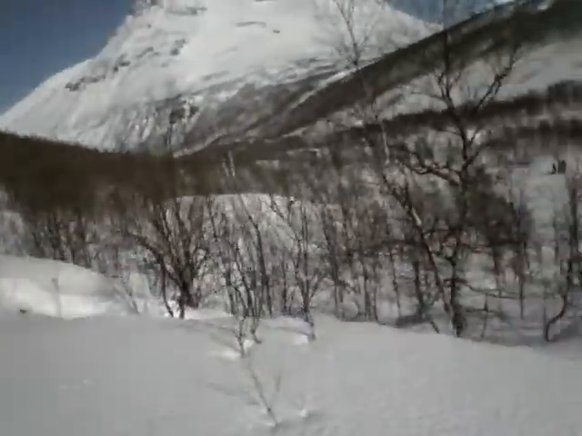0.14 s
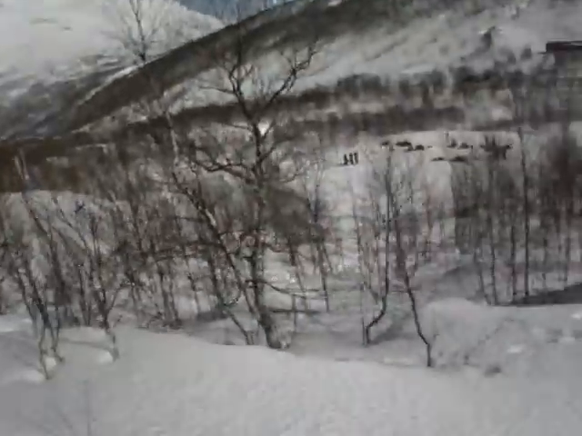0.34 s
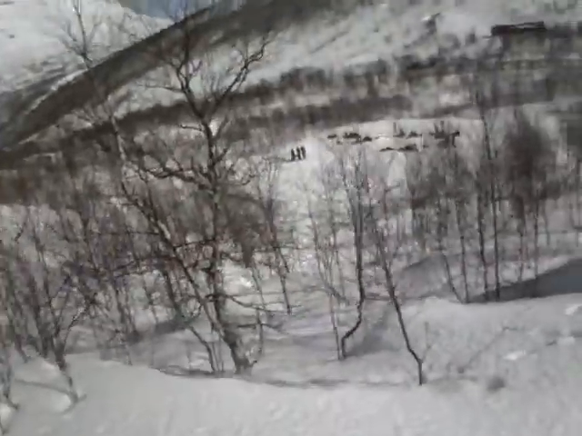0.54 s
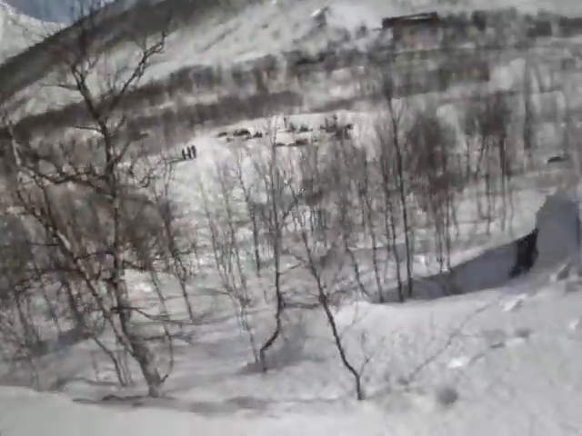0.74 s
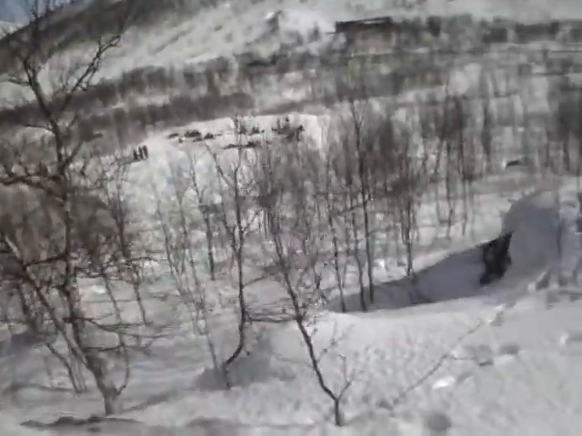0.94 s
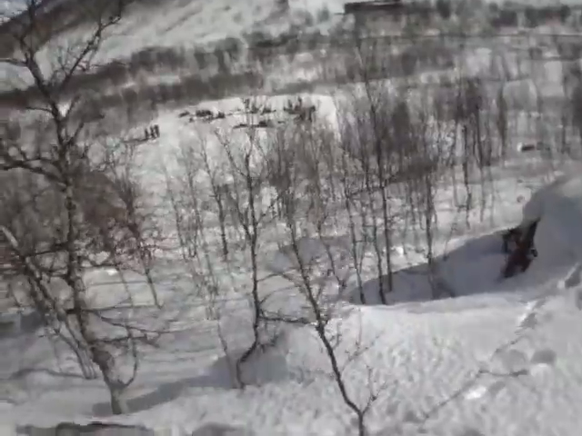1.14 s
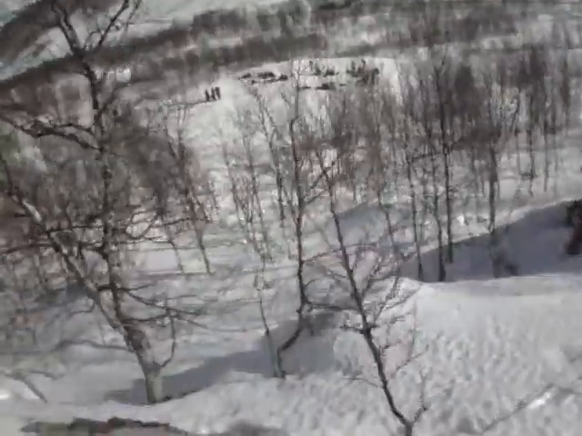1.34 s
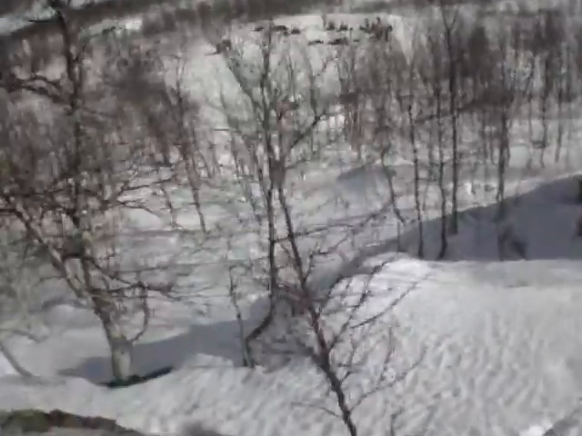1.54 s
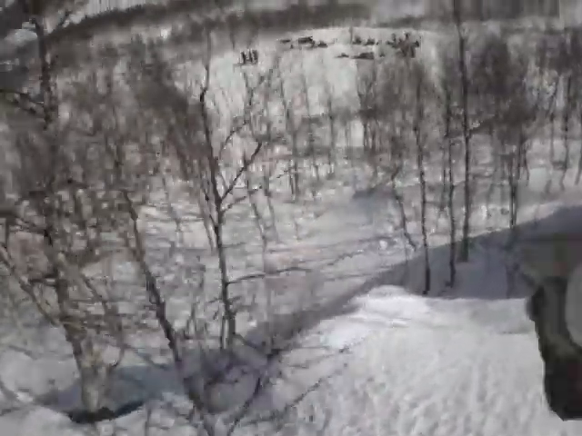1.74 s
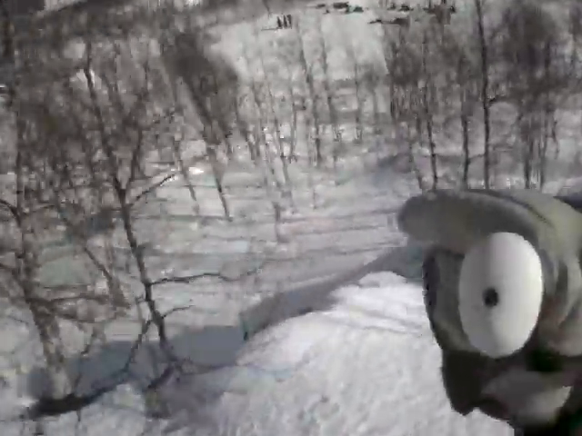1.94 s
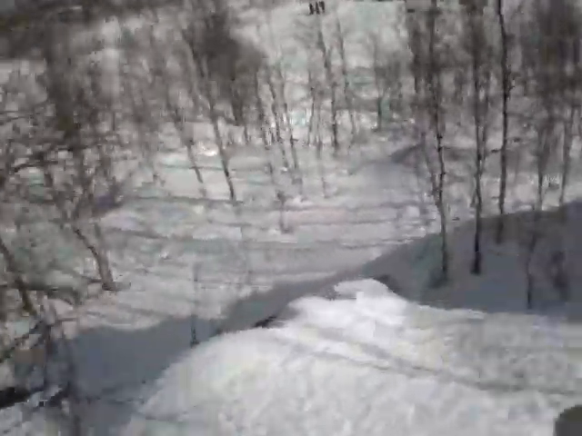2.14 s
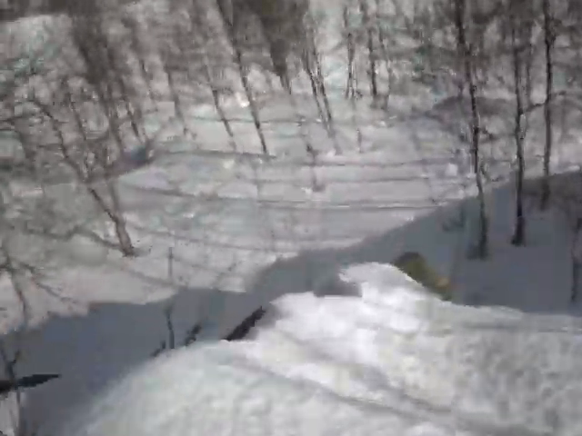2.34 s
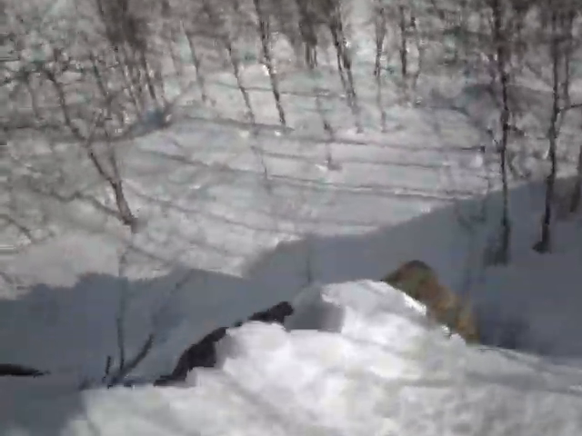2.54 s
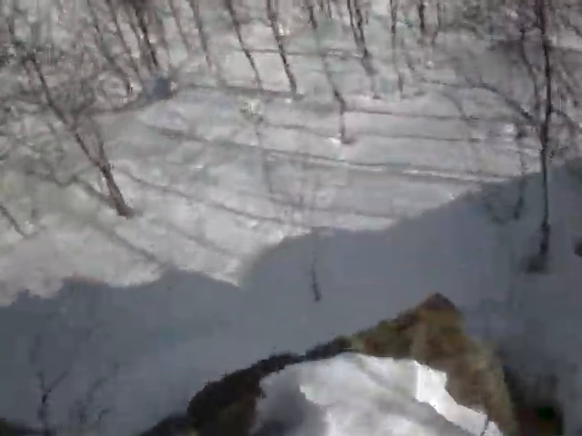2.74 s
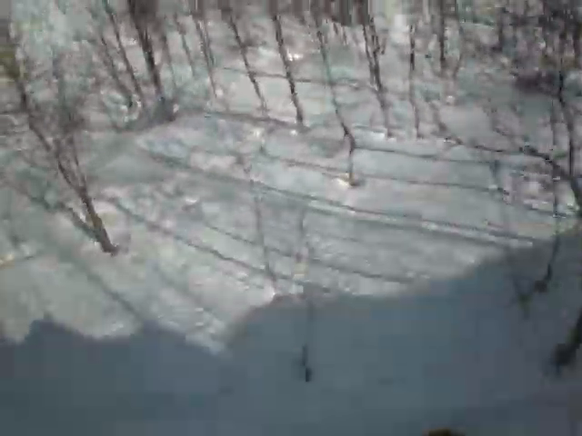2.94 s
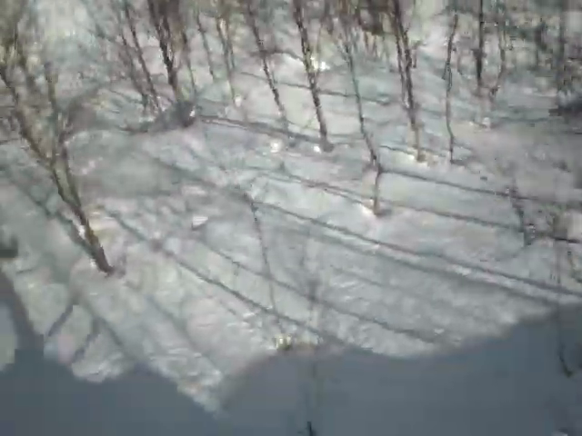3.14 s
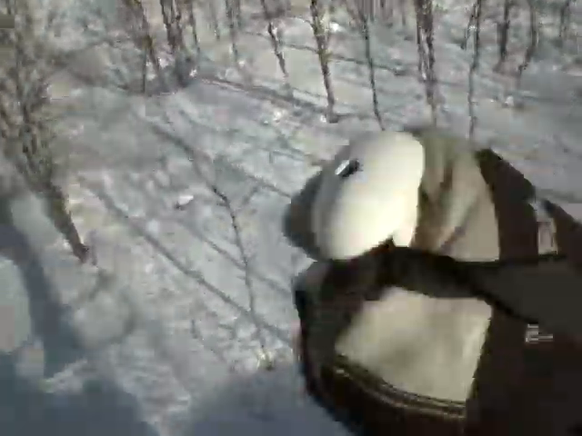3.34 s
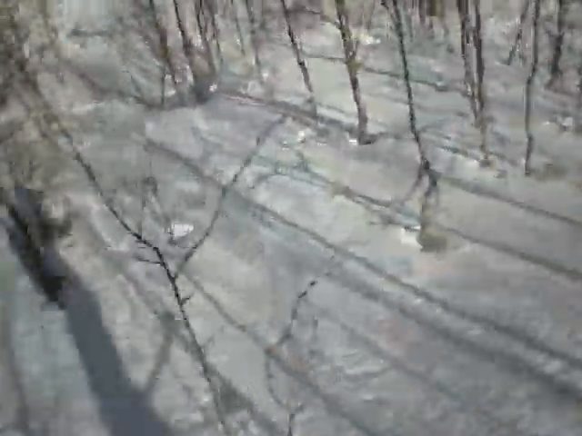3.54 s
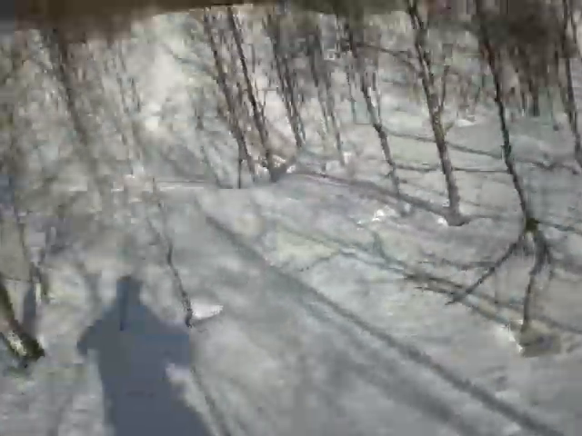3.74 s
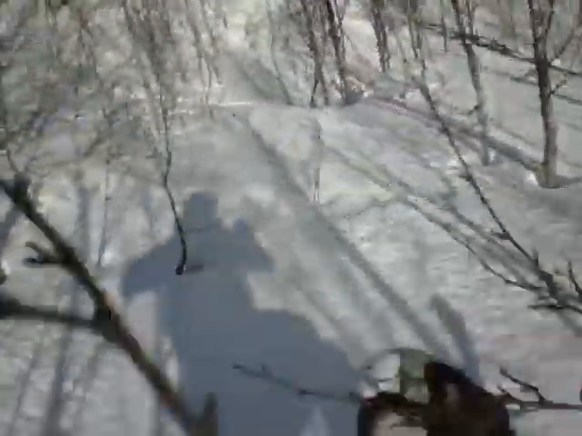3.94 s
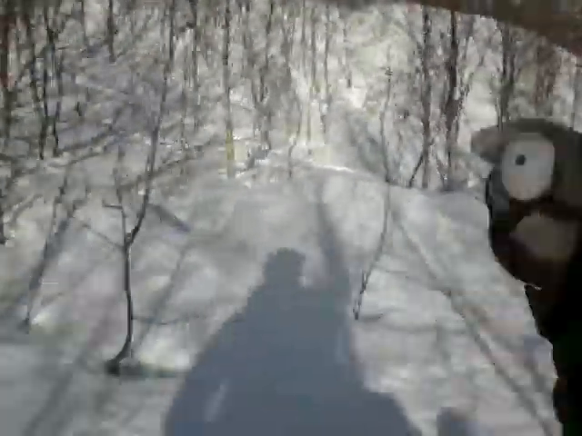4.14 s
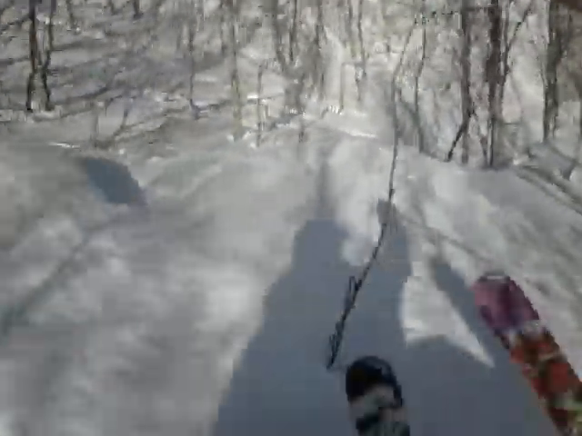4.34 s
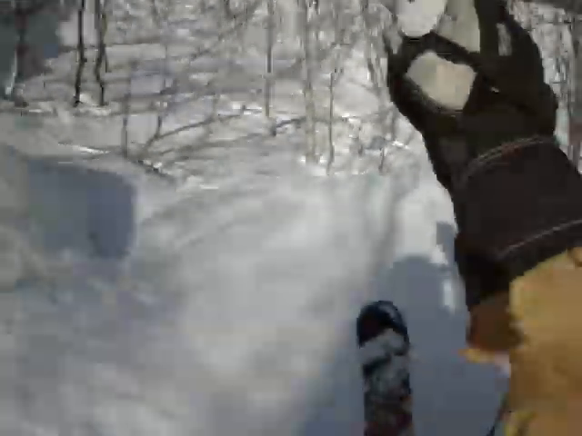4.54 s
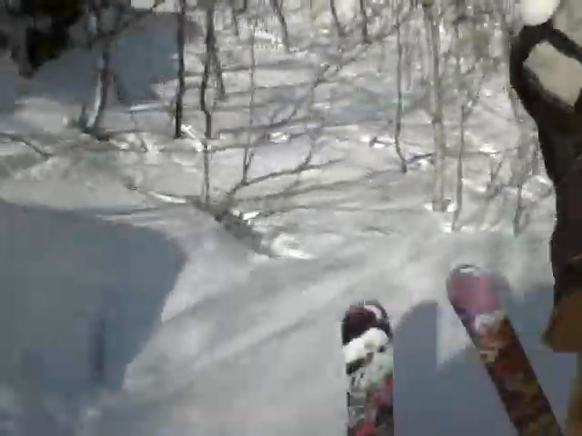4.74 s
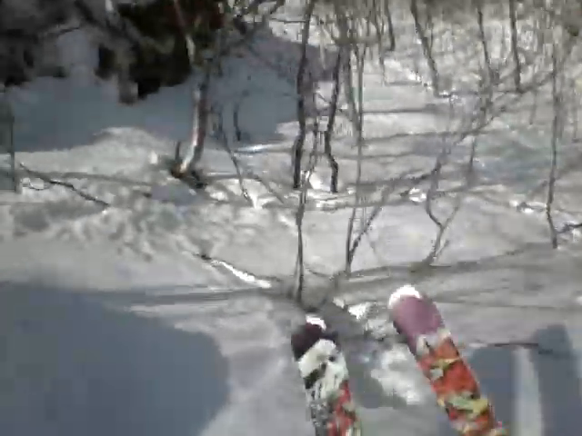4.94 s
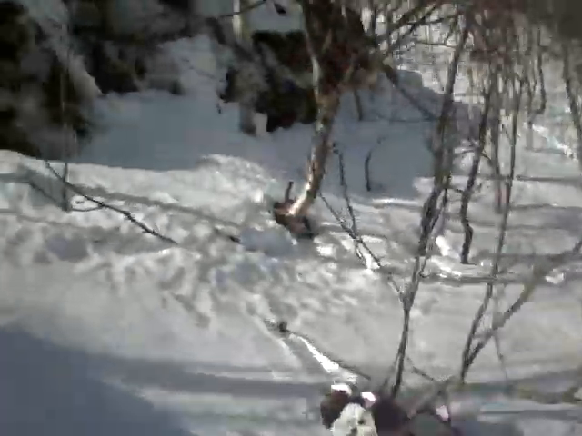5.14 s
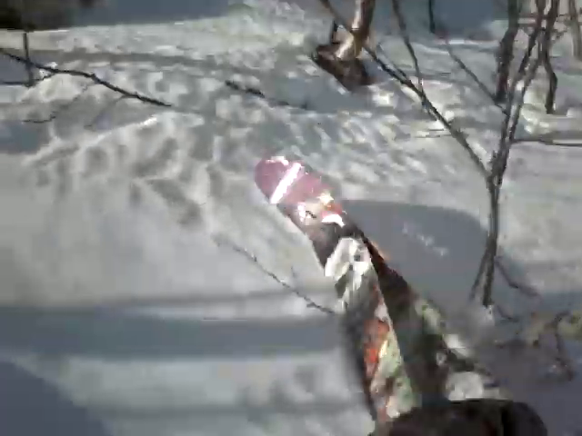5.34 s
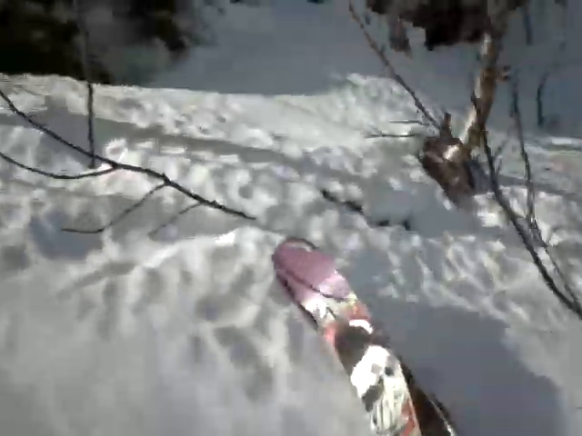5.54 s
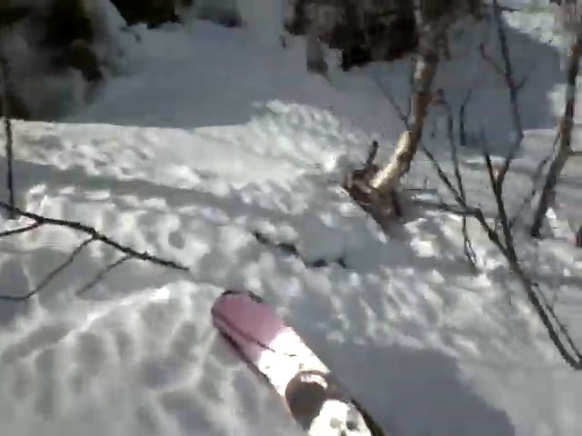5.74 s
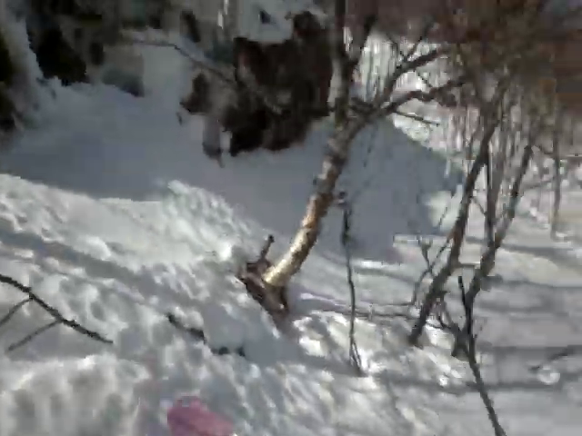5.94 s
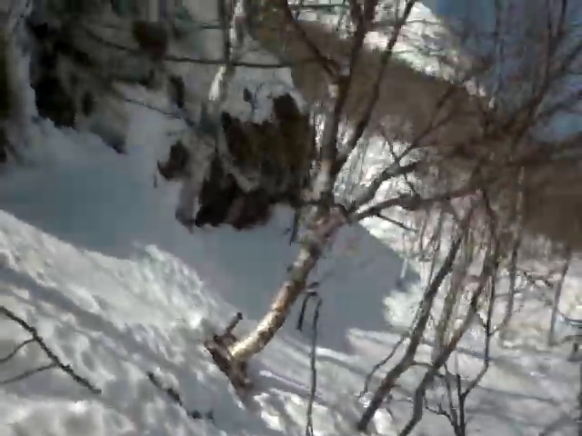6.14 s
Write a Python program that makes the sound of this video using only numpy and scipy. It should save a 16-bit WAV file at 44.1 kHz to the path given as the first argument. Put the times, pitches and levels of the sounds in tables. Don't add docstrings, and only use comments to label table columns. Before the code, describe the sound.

From a small helmet microphone outdoors, skis whisper over snow while blunt knocks and little ticks hit the housing. Wind builds in low buffets and an edge stroke rasps harder. The glide drops out briefly in a jump, then a hard landing bursts into clipped booms and harsh scrapes. Twigs snap, a pole rings briefly, more jolts follow, and it settles into faint rasping. The sound is narrow, dull and close.

```python
import sys
import numpy as np
from scipy import signal
from scipy.fft import rfft, irfft, next_fast_len
from scipy.io import wavfile
from scipy.ndimage import map_coordinates

SR = 44100
rng = np.random.default_rng(int(sys.argv[2]) if len(sys.argv) > 2 else 0)


def makeup_ratio(level_db):
    decades = np.asarray(level_db, float) / 20
    return 10 ** decades


def inscribe(sig):
    pcm = np.round(np.clip(np.atleast_2d(sig).T, -1, 1) * 32767)
    wavfile.write(sys.argv[1], SR, pcm.astype(np.int16))


N = 276934
MID_WIND_DB, MID_SHAKE_DB, MID_RUB_DB = -27, -22, -30


def unit(x):
    return x / np.sqrt(np.mean(x ** 2) + 1e-20)


def seconds():
    return np.arange(N) / SR


def noise():
    return rng.standard_normal(N)


def wobble(rate):
    knots = rng.standard_normal(int(N * rate / SR) + 4)
    return map_coordinates(knots, [np.arange(N) * rate / SR])


def filtered(x, response):
    size = next_fast_len(N + SR // 2)
    hz = np.fft.rfftfreq(size, 1 / SR)
    return irfft(rfft(x, size) * response(hz), size)[..., :N]


def along(points, hz):
    point_hz, value = np.transpose(points)
    return np.interp(np.log(hz + 1), np.log(point_hz + 1), value)


def coloured(x, spectrum):
    return unit(filtered(x, lambda hz: makeup_ratio(along(spectrum, hz))))


def resonant(x, modes):
    def response(hz):
        body = 0
        for k, (centre, width, db) in enumerate(modes):
            damping = 1j * hz * width
            body = body + (-1) ** k * makeup_ratio(db / 2) * damping / (centre ** 2 - hz ** 2 + damping)
        return body ** 2
    return unit(filtered(x, response))


def grainy(per_second, spread_db, share):
    chance, size, sign = rng.random(N), rng.exponential(size=N), noise()
    grains = (chance < per_second / SR) * sign * makeup_ratio(spread_db * np.minimum(size, 3))
    return np.sqrt(share) * unit(grains) + np.sqrt(1 - share) * noise()


def follows(middle_db, *drives):
    return middle_db + sum(gain * drive for drive, gain in drives)


def with_swells(curve, swells, rise, fall):
    t = seconds()
    curve_s, curve_db = np.transpose(curve)
    power = makeup_ratio(2 * np.interp(t, curve_s, curve_db))
    for start, length, db in swells:
        u = (t - start) / length
        shape = np.clip(u / rise, 0, 1) * np.clip((1 - u) / fall, 0, 1)
        power = power + makeup_ratio(2 * db) * shape ** 2
    return 10 * np.log10(power)


# time in seconds, strength in dB.
WIND_CURVE = [(0, -43), (.5, -43.5), (.7, -31.5), (1.05, -37.5), (1.35, -27), (1.6, -37), (1.87, -34.5),
              (2.15, -22), (2.6, -31), (3.0, -27), (3.4, -19), (4.0, -16.5), (4.45, -18), (5.0, -21),
              (5.35, -20.5), (5.55, -36), (6.0, -32.5), (6.28, -38)]
# start in seconds, length in seconds, strength in dB.
GUST_SWELLS = [(0.541, 0.087, -32), (1.68, .1, -31), (1.888, 0.16, -19.5), (2.24, .09, -20),
               (2.326, 0.12, -18.5), (3.097, 0.14, -24.5), (3.46, .16, -15.5), (3.675, .15, -11.5),
               (4.092, .19, -8), (4.536, .13, -13), (4.71, .07, -15.5), (4.797, .07, -17),
               (4.891, .13, -16), (5.295, 0.057, -27.5)]


def wind_drive():
    return with_swells(WIND_CURVE, GUST_SWELLS, rise=0.33, fall=0.4) - MID_WIND_DB


# time in seconds, strength in dB.
SHAKE_CURVE = [(0, -30.5), (.2, -32), (.65, -25), (1.05, -25.5), (1.55, -33), (1.85, -31.5), (2.0, -19),
               (2.6, -23), (2.7, -31), (3.1, -23.5), (3.3, -32.5), (3.55, -17.5), (3.95, -18),
               (4.68, -19.5), (5.0, -18), (5.45, -22.5), (5.7, -29), (6.28, -29)]
# start in seconds, length in seconds, strength in dB.
JOLT_SWELLS = [(.25, 0.076, -28), (1.129, .3, -22.5), (2.242, 0.44, -22), (2.32, .17, -21.5),
               (3.445, .17, -15), (3.702, .12, -12), (3.829, 0.043, -15), (4.027, .21, -5),
               (4.267, 0.23, -13.5), (4.492, 0.075, -16.5), (4.714, 0.056, -19), (5.061, 0.094, -12.5),
               (5.126, 0.19, -10.5), (5.366, 0.064, -20), (5.79, 0.16, -27.5)]


def shake_drive():
    return with_swells(SHAKE_CURVE, JOLT_SWELLS, rise=0.13, fall=0.45) - MID_SHAKE_DB


# time in seconds, strength in dB.
GLIDE_CURVE = [(0, -42.5), (.5, -40.5), (1.08, -41.5), (1.5, -36), (1.85, -36.5), (2.15, -29.5),
               (2.7, -31.5), (3.22, -33.5), (3.33, -48), (3.65, -48), (3.75, -35.5), (3.97, -32.5),
               (4.3, -30), (5.0, -25), (5.5, -27.5), (5.65, -35), (5.69, -46.5), (6.28, -35)]
# start in seconds, length in seconds, strength in dB.
EDGE_STROKES = [(0.253, 0.043, -33.5), (0.363, .14, -43), (0.564, 0.13, -34.5), (0.664, 0.17, -34.5),
                (.83, 0.036, -38), (1.121, .14, -33), (1.22, 0.29, -29), (1.6, .18, -38),
                (2.185, 0.51, -22), (2.31, .22, -23), (2.772, 0.093, -30), (3.476, 0.053, -40.5),
                (3.563, .06, -35), (3.688, .1, -24.5), (3.811, .06, -28), (4.03, .09, -14),
                (4.13, .12, -21), (4.309, 0.21, -18.5), (4.499, .07, -27), (4.711, .045, -21),
                (4.885, 0.049, -31), (5.071, 0.12, -26.5), (5.133, 0.2, -20.5), (5.363, 0.12, -25.5),
                (5.594, .09, -35.5), (5.721, 0.044, -33), (5.767, 0.16, -27), (5.916, 0.047, -34.5),
                (6.017, 0.045, -34), (6.08, 0.19, -34.5)]


def rub_drive():
    return with_swells(GLIDE_CURVE, EDGE_STROKES, rise=0.16, fall=0.29) - MID_RUB_DB


# frequency in Hz, level in dB per Hz.
HEAVE_SPECTRUM = [(6, -27.5), (20, -2.5), (45, -1), (85, -5.5), (130, -28), (300, -54), (600, -120)]
# frequency in Hz, level in dB per Hz.
BUFFET_SPECTRUM = [(25, -120), (65, -21), (100, -2.5), (145, -3.5), (210, -5.5), (400, -33), (1500, -120)]
# centre in Hz, width in Hz, level in dB.
PORT_MODES = [(319, 284, 0)]
# centre in Hz, width in Hz, level in dB.
CAVITY_MODES = [(529, 340, 9), (816, 320, -11.5)]


def wind(flutter, air, shake):
    heave = coloured(makeup_ratio(4.2 * wobble(14)) * noise(), HEAVE_SPECTRUM)
    buffet = coloured(makeup_ratio(2.5 * wobble(14)) * noise(), BUFFET_SPECTRUM)
    port_kicks = makeup_ratio(flutter + 0.75 * wobble(30)) * grainy(per_second=240, spread_db=2.5, share=0.37)
    cavity_kicks = makeup_ratio(2.0 * flutter + 0.24 * wobble(45)) * grainy(per_second=240, spread_db=-0.5, share=0.27)
    heave_db = follows(-27.5, (air, 1.154))
    buffet_db = follows(-26, (air, 0.93))
    port_db = follows(-24, (air, 0.59), (shake, 0.36))
    cavity_db = follows(-22, (air, 0.012), (shake, 0.98))
    pressure = makeup_ratio(heave_db) * heave + makeup_ratio(buffet_db) * buffet
    port = makeup_ratio(port_db) * resonant(port_kicks, PORT_MODES)
    cavity = makeup_ratio(cavity_db) * resonant(cavity_kicks, CAVITY_MODES)
    return pressure + port + cavity


# frequency in Hz, level in dB per Hz.
CRUNCH_SPECTRUM = [(500, -120), (800, 3.5), (1000, -14.5), (1300, -1.5), (1700, -10), (2100, -11),
                   (3000, -120)]
# centre in Hz, width in Hz, level in dB.
SHELL_MODES = [(2470, 420, 0.74), (2947, 376, 0.32)]
# centre in Hz, width in Hz, level in dB.
LOW_SHELL_MODES = [(2034, 550, 0.0032)]
# centre in Hz, width in Hz, level in dB.
FIZZ_MODES = [(3214, 353, -1.5), (3520, 1160, -9)]


def snow(flutter, shake, rub):
    rough_db = 1.3 * wobble(22)
    grains = makeup_ratio(2.3 * flutter + rough_db) * grainy(per_second=700, spread_db=3.5, share=0.3)

    def patchy():
        return grains * makeup_ratio(1.64 * wobble(20))

    landed = seconds() > 3.7
    crunch_db = follows(-39.5, (shake, 0.59), (rub, 0.13))
    low_db = follows(-33, (rub, 0.83))
    fizz_db = follows(-41, (rub, 1.02)) + 3.5 * landed
    crunch = makeup_ratio(crunch_db) * coloured(patchy(), CRUNCH_SPECTRUM)
    rasp = makeup_ratio(MID_RUB_DB + rub) * resonant(patchy(), SHELL_MODES)
    low = makeup_ratio(low_db) * resonant(patchy(), LOW_SHELL_MODES)
    fizz = makeup_ratio(fizz_db) * resonant(patchy(), FIZZ_MODES)
    return rasp - low + fizz + crunch


# centre in Hz, width in Hz, level in dB.
HELMET_MODES = [(911, 170, 0)]


def helmet(flutter, shake, rub):
    patter = makeup_ratio(1.2 * flutter + 1.9 * wobble(35)) * grainy(per_second=400, spread_db=0.0, share=0.3)
    hum_db = follows(-39.5, (shake, 0.58), (rub, 0.5))
    return makeup_ratio(hum_db) * resonant(patter, HELMET_MODES)


# frequency in Hz, level in dB per Hz.
HISS_SPECTRUM = [(300, -39.5), (1500, -20), (3000, 1.5), (4300, -2), (6000, 1.5)]


def hiss():
    return makeup_ratio(-55 + 2.5 * wobble(25)) * coloured(noise(), HISS_SPECTRUM)


def hits(events, gain_db, attack_s, puff):
    out = np.zeros(N + SR)
    t = np.arange(SR // 10) / SR
    shell_noise = resonant(noise(), LOW_SHELL_MODES + SHELL_MODES + FIZZ_MODES)
    shell_noise = np.pad(shell_noise, (0, SR))
    for start, db, hz, t60 in events:
        i = round(start * SR)
        ring = np.sin(2 * np.pi * hz * t) + puff * shell_noise[i:i + len(t)]
        decay = makeup_ratio(db + gain_db - 60 * t / max(t60, 0.003))
        out[i:i + len(t)] += decay * (1 - np.exp(-t / attack_s)) * ring
    return out[:N]


# time in seconds, peak in dB, pitch in Hz.
TICK_EVENTS = [(.0522, -14.5, 1520), (.163, -27, 2640), (.27, -17.5, 2600), (.6245, -14.5, 2870),
               (2.2155, -9, 2260), (2.8722, -17, 1550), (3.0836, -16.5, 2490), (3.1344, -8.5, 2210),
               (3.2633, -19, 2300), (3.3992, -24, 1230), (3.4067, -23, 3120), (3.6046, -10.5, 2200),
               (3.7119, -13.5, 3120), (3.7913, -3.5, 2760), (3.8162, -12.5, 2510), (3.9052, -16, 2660),
               (3.9437, -9, 2650), (3.9715, -17, 2405), (4.3085, -10.5, 2550), (4.477, -10, 2310),
               (4.941, -10, 2720)]


def ticks():
    events = [(s, db, hz, 0.01) for s, db, hz in TICK_EVENTS]
    return hits(events, gain_db=5.5, attack_s=0.0011, puff=0.9)


# time in seconds, peak in dB, pitch in Hz.
KNOCK_EVENTS = [(.053, -7.5, 540), (.162, -19, 690), (.533, -15.5, 549), (.627, -4, 640), (.7, -4, 630),
                (.793, -8.5, 544), (.87, -16, 530), (1.036, -26, 549), (1.223, -2.5, 606), (2.296, -8, 606),
                (2.352, 0, 483), (2.406, -0.5, 686), (2.465, -0.5, 530), (2.87, -10.5, 560),
                (3.192, -8, 414), (3.488, -6, 590), (3.556, -6, 466), (3.575, 2, 570), (3.642, -7, 570),
                (3.758, 5.5, 549), (3.891, -3.5, 457), (4.553, -7.5, 541), (4.61, -8.5, 447),
                (4.826, -5.5, 425), (4.893, -3, 538), (4.941, -13, 547), (5.025, 0.5, 450), (5.11, 1, 401),
                (5.514, -12.5, 520), (5.98, -14, 590)]


def knocks():
    events = [(s, db, hz, 0.013) for s, db, hz in KNOCK_EVENTS]
    return hits(events, gain_db=7.5, attack_s=0.0017, puff=0.045)


# centre in seconds, width in seconds, pressure (- pulls, + presses).
GUST_FRONTS = [(1.96, 0.0081, -0.43), (3.522, 0.028, -0.21), (3.698, 0.0083, 0.19), (3.738, 0.018, -0.54),
               (3.839, 0.094, 0.31), (3.998, 0.003, -0.5), (4.195, 0.0041, -1.3), (4.231, 0.0098, 1),
               (4.244, 0.004, 0.44), (4.282, 0.012, -0.43), (4.611, 0.006, -0.11), (4.738, 0.006, -0.7),
               (4.743, 0.0041, -0.12), (4.842, 0.021, -0.04), (4.923, 0.0077, -0.26), (5.34, 0.041, 0.25)]


def shoves():
    t = seconds()
    return sum(pressure * np.exp(-(2 * (t - s) / width) ** 2) for s, width, pressure in GUST_FRONTS)


# start in seconds, length in seconds, boom in dB, rasp in dB.
SCRAPE_EVENTS = [
    (3.772, 0.032, -11, -24.5),
    (4.004, 0.011, -10.5, -7),
    (4.032, 0.039, 5.5, -12),
    (4.071, 0.016, -13.5, -0.5),
    (4.088, 0.056, 7, -7.5),
    (4.171, 0.019, -5, -6.5),
    (4.198, 0.035, 5.5, -14),
    (4.72, 0.019, -9.5, -4.5),
    (5.139, 0.1, -15, -34),
    (5.3778, 0.0072, -3, -3.5),
]


def scrapes():
    t = seconds()
    boom, rasp = np.zeros(N), np.zeros(N)
    for start, length, boom_db, rasp_db in SCRAPE_EVENTS:
        onset = np.clip((t - start) / 0.00097, 0, 1)
        release = np.clip((start + length - t) / 0.0029, 0, 1)
        boom += makeup_ratio(boom_db) * onset * release
        rasp += makeup_ratio(rasp_db) * onset * release
    drag = grainy(per_second=900, spread_db=3, share=0.5)
    rasp_modes = [(1292, 1400, 6)] + LOW_SHELL_MODES + SHELL_MODES + FIZZ_MODES
    return boom * resonant(drag, CAVITY_MODES) + rasp * resonant(drag, rasp_modes)


# start in seconds, length in seconds, from Hz, to Hz, level in dB.
WHIP_EVENTS = [
    (4.453, .007, 4000, 1750, -6),
    (4.7155, .018, 250, 1300, 7),
]


def whips():
    out = np.zeros(N)
    for start, length, from_hz, to_hz, db in WHIP_EVENTS:
        u = np.arange(round(length * SR)) / (length * SR)
        hz = from_hz * (to_hz / from_hz) ** u
        tone = np.sin(2 * np.pi * np.cumsum(hz) / SR)
        growing_noise = 1.3 * u * rng.standard_normal(len(u))
        steady_noise = 0.3 * rng.standard_normal(len(u))
        envelope = np.sin(np.pi * np.sqrt(u)) ** 0.5
        out[round(start * SR):][:len(u)] += makeup_ratio(db) * (tone + growing_noise + steady_noise) * envelope
    return out


# frequency in Hz, level in dB, t60 in seconds.
POLE_MODES = [(2530, -2, .11), (2810, -.5, .1), (3047, 0, .09), (3840, .5, .08), (4188, -8.5, .061)]


def pole():
    events = [(4.738, db, hz, t60) for hz, db, t60 in POLE_MODES]
    return hits(events, gain_db=-8.5, attack_s=0.0008, puff=0.059)


def scene():
    flutter = 0.45 * wobble(9)
    air, shake, rub = wind_drive(), shake_drive(), rub_drive()
    steady = wind(flutter, air, shake) + snow(flutter, shake, rub) + helmet(flutter, shake, rub) + hiss()
    contacts = ticks() + knocks() + scrapes() + whips() + pole()
    return (steady + shoves() + contacts)[None]


def roll_off(x):
    return signal.sosfilt(signal.butter(12, 16490, fs=SR, output="sos"), x)


# frequency in Hz, gain in dB.
BAND_LIMIT = [(3800, 0), (4150, -4), (4300, -10), (4480, -21), (4570, -29), (4650, -40), (4750, -56),
              (4850, -90)]


def record(dry):
    saturated = np.clip(dry, -0.717, 0.717)
    narrow = filtered(saturated, lambda hz: makeup_ratio(along(BAND_LIMIT, hz)) * (hz < BAND_LIMIT[-1][0]))
    shaved = np.clip(narrow, -0.708, 0.708)
    return roll_off(shaved)


dry = scene()
out = record(dry)
inscribe(out)
```